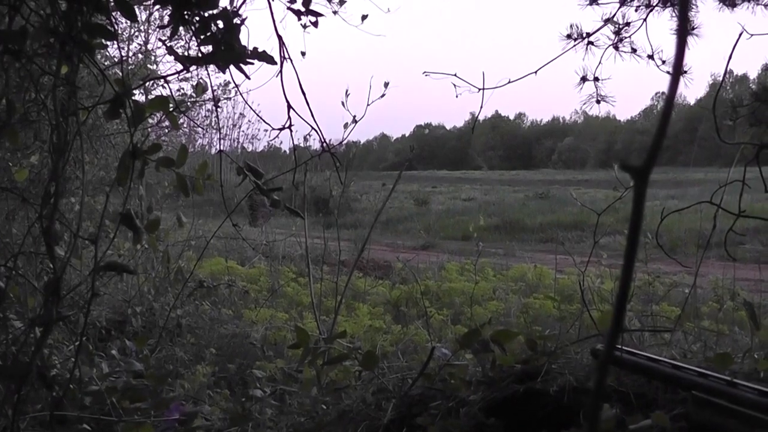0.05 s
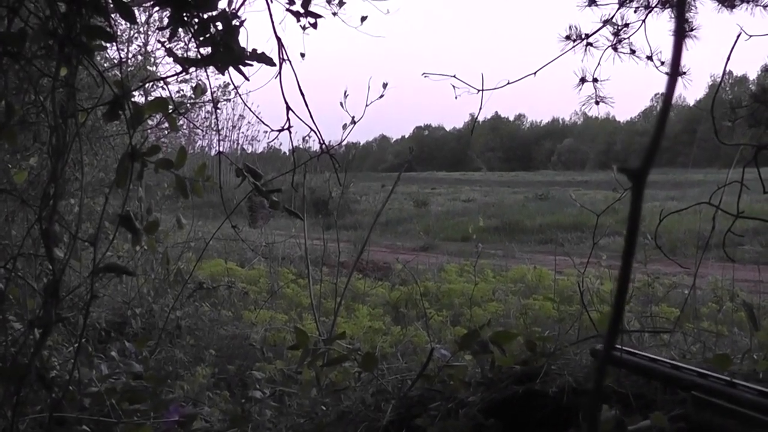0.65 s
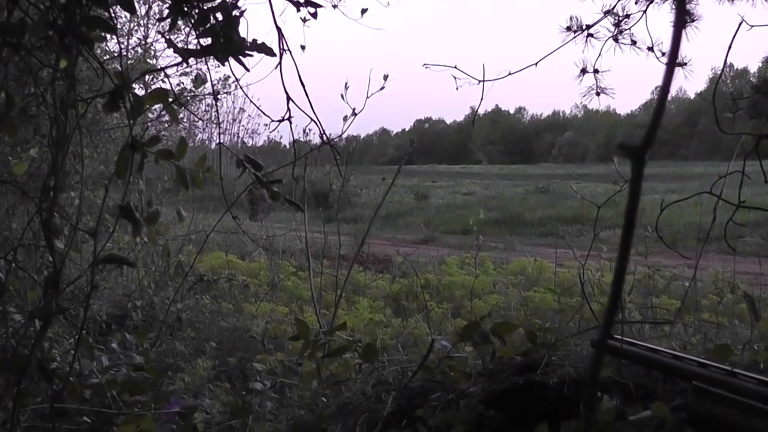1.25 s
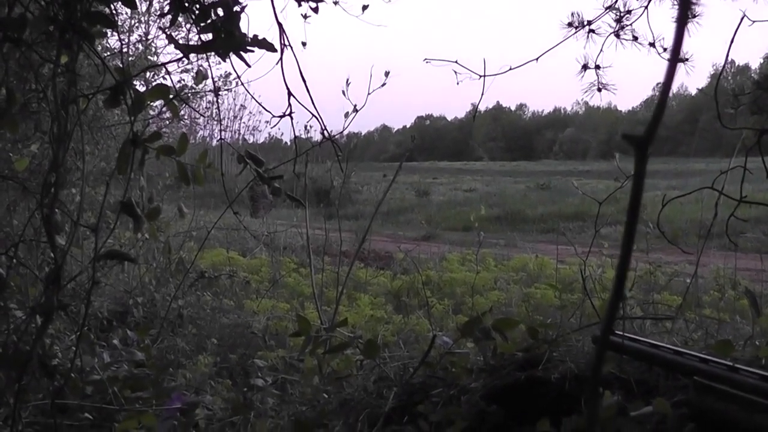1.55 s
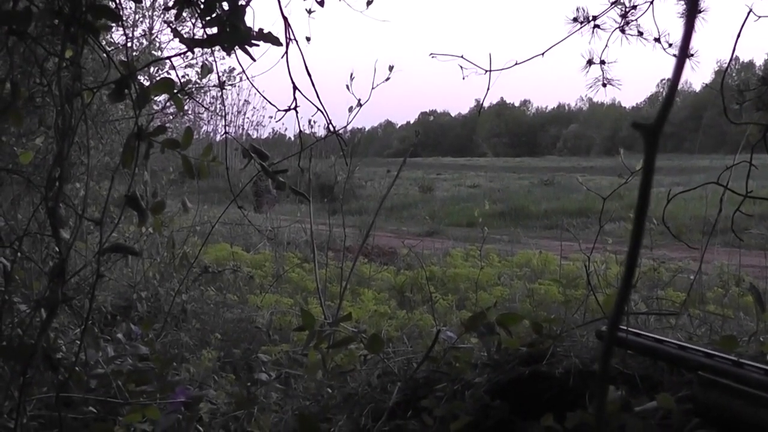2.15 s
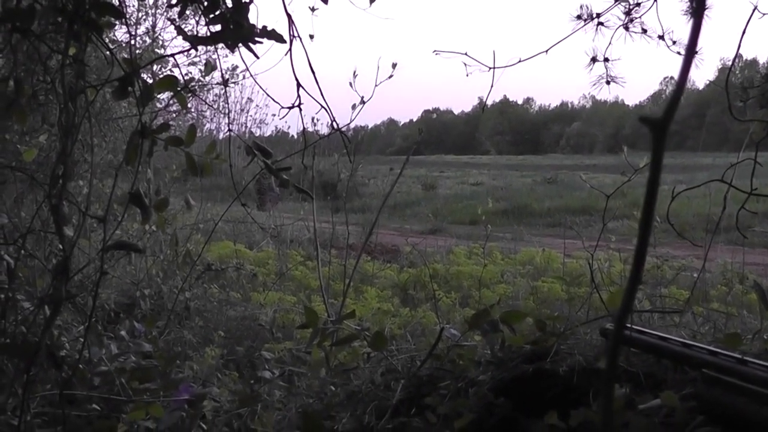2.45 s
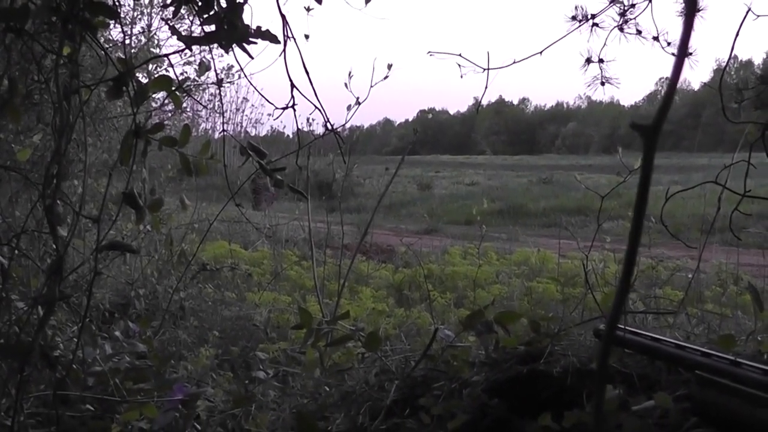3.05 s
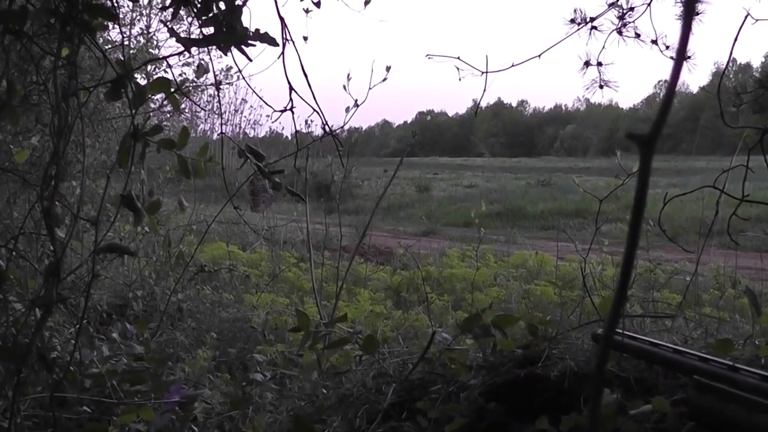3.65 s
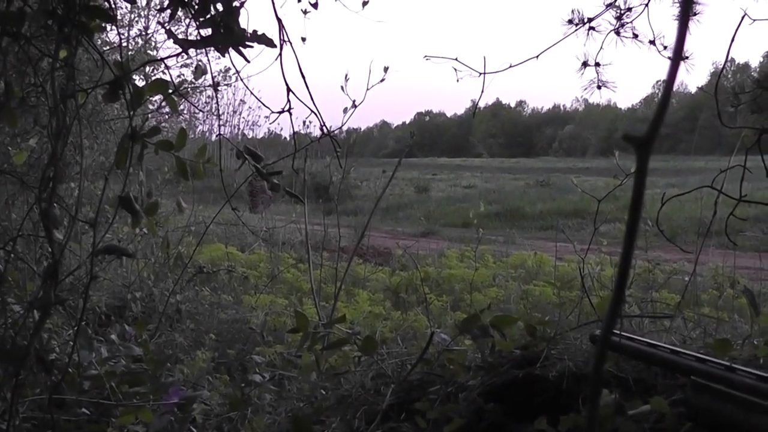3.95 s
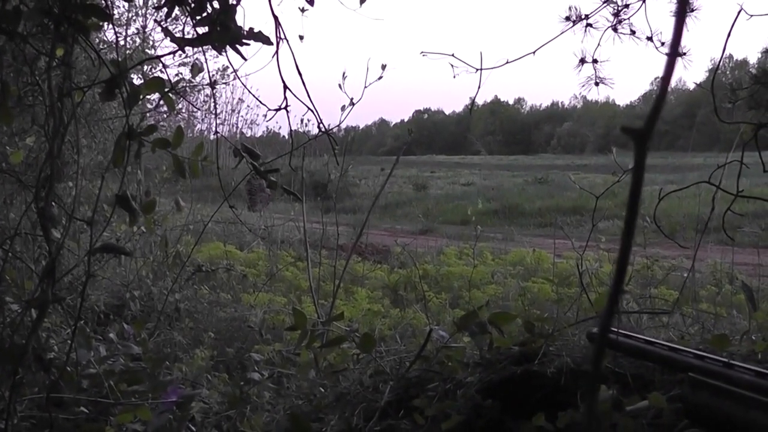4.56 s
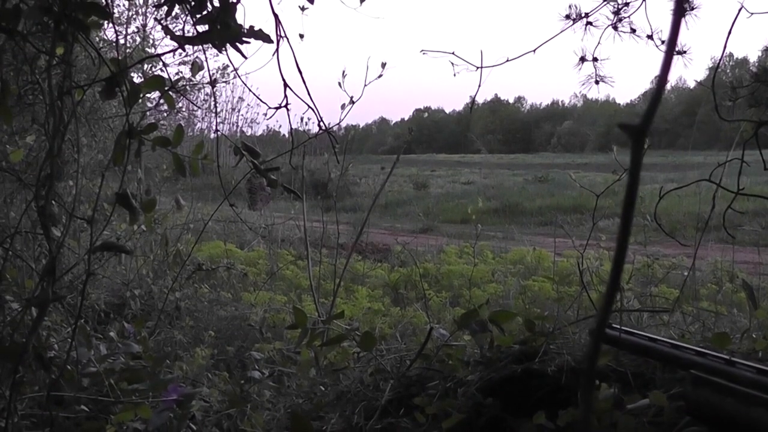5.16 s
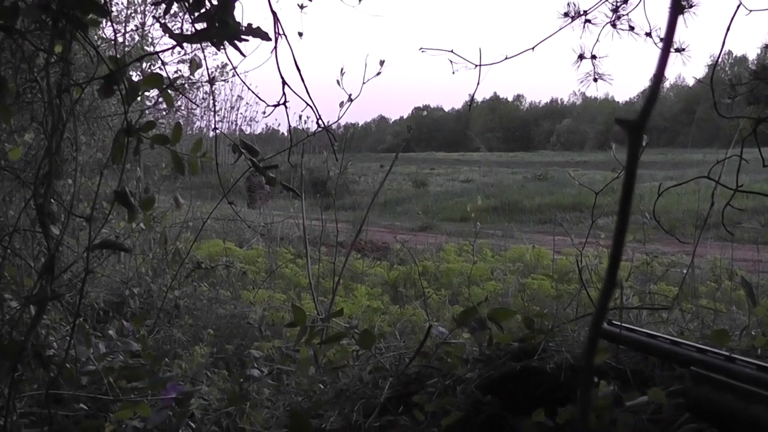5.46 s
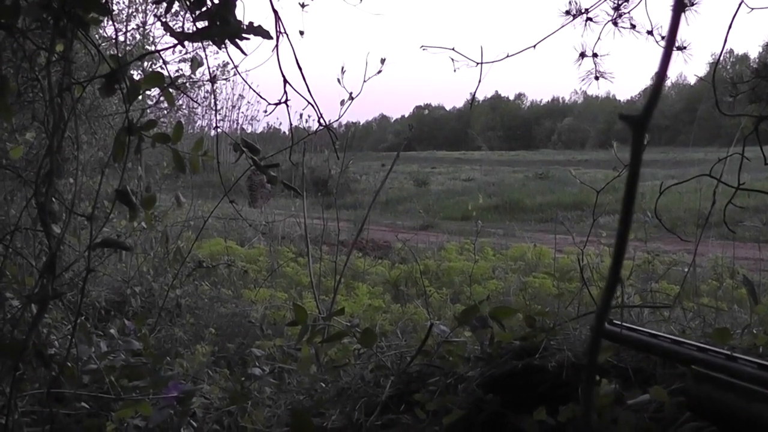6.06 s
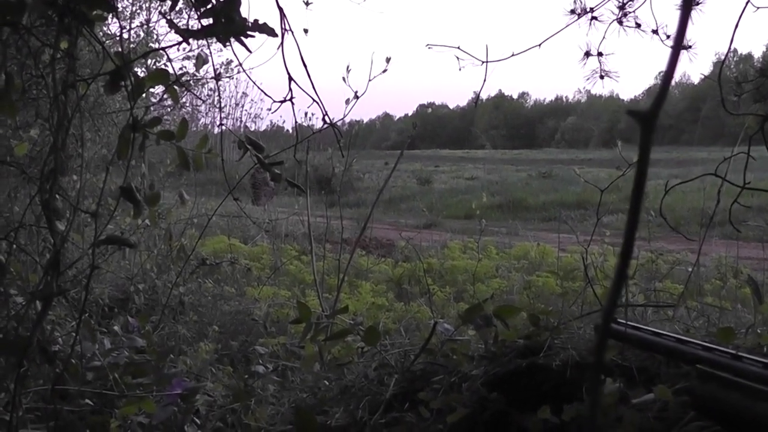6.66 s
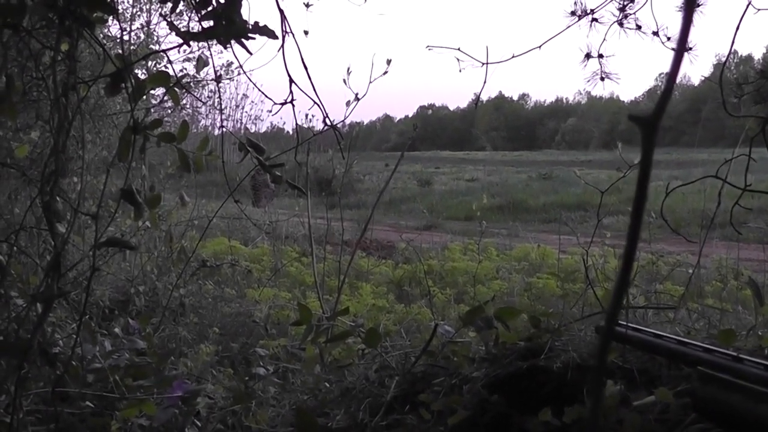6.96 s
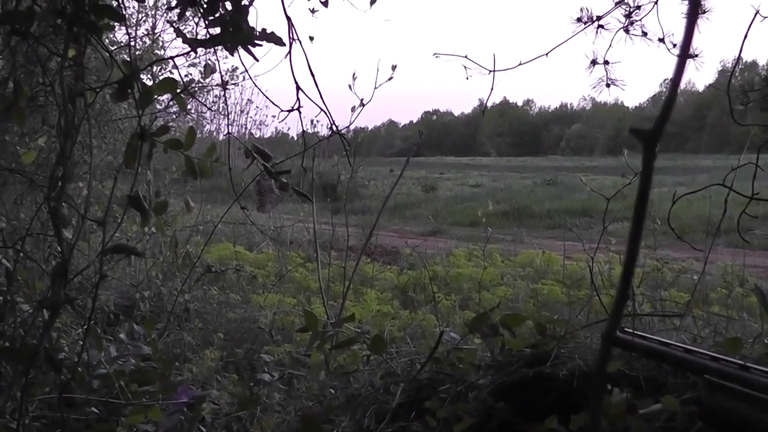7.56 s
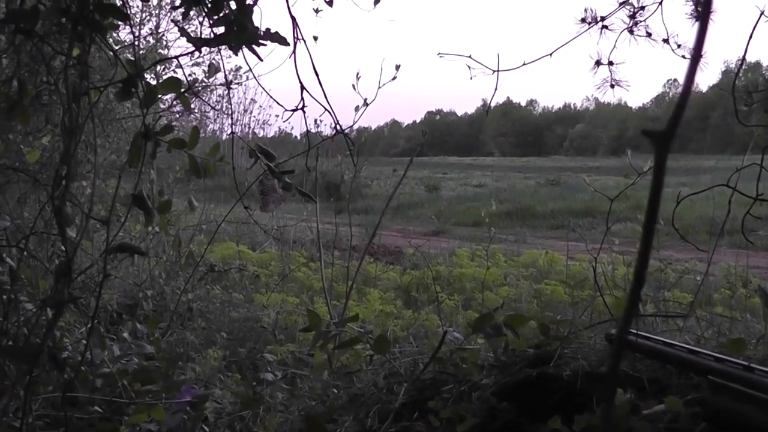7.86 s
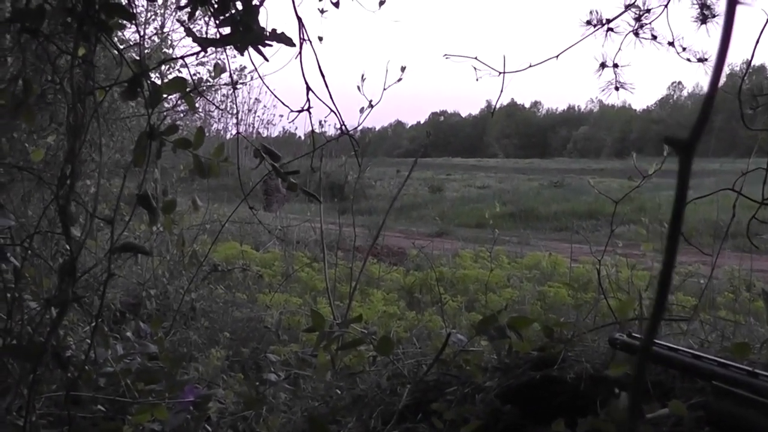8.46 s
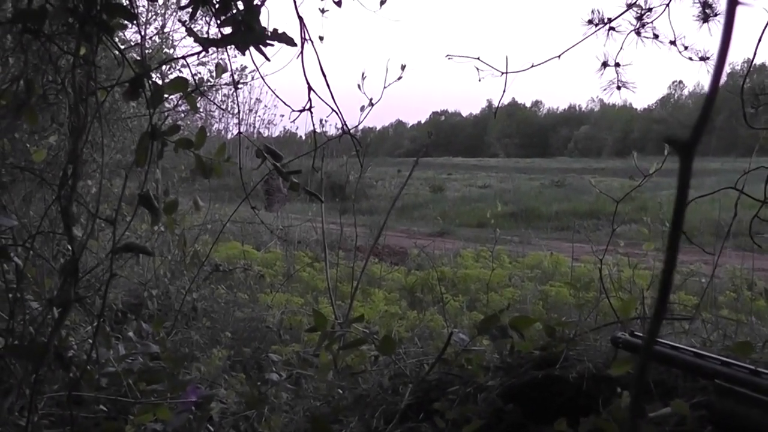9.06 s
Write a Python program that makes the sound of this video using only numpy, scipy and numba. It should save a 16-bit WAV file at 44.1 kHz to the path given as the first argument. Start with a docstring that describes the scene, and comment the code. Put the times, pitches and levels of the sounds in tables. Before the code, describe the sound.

Songbirds sing quietly at a field's edge, then a nearby reed turkey call gives nine evenly spaced, raspy yelps.

```python
"""A reed turkey call plays a run of raspy yelps, close by on the left, at the wooded edge of a field.
Each yelp starts as a whistle and breaks into a rattle as the reed slaps and rings the call's cavity;
in between, the slack reed whines and sputters. Songbirds sing in the trees, twigs and gear tick, and
far traffic drones under a soft hiss. A limiter ducks the background once the yelps begin."""
import sys
import numpy as np
from scipy import signal
from scipy.fft import rfft, irfft, next_fast_len
from scipy.io import wavfile
from scipy.ndimage import uniform_filter1d
from numba import njit

SR = 44100
rng = np.random.default_rng(int(sys.argv[2]) if len(sys.argv) > 2 else 0)


def put_to_file(sound):
    """Save the sound as 16-bit audio at rate SR, in the file named by the first command-line argument."""
    columns = np.atleast_2d(sound).T  # one column per channel
    safe = np.clip(columns, -1, 1)
    whole_steps = np.round(safe * 32767)
    wavfile.write(sys.argv[1], SR, whole_steps.astype(np.int16))


N = 410571
TIME = np.arange(N) / SR

# the yelps: (start [s], length [s], level [dB], rattle [dB], whistle pitch [Hz], whistle decay [s])
YELP_CUES = [(6.354, 0.04, -20.5, -12.5, 1132, 0.048), (6.681, 0.046, -18, -8.5, 1194, 0.012),
             (7.006, 0.058, -14.5, -6.5, 1235, 0.0056), (7.343, 0.047, -12.5, -8.5, 1198, 0.0023),
             (7.676, 0.066, -14.5, -5, 1201, 0.0038), (8.026, 0.087, -14.5, -4, 1293, 0.0071),
             (8.391, 0.1, -14, -5, 1266, 0.0062), (8.775, 0.1, -11.5, -3.5, 1283, 0.0047),
             (9.171, 0.110, -13, -5.5, 1224, 0.0075)]
# resonances of the call's cavity: (frequency [Hz], width [Hz], level [dB])
CAVITY_MODES = [(595, 210, -26.5), (828, 120, -12), (1100, 550, -1), (1620, 205, 9), (1850, 486, -2.5),
                (2250, 430, -1), (2680, 510, -5.5), (3375, 82, -22.5), (3840, 220, 0.5), (4790, 220, -20.5)]
# noisy edge of the slaps: (frequency [Hz], level [dB])
EDGE_EQ = [(100, -5), (300, 2.5), (600, 5), (1500, 5.5), (4000, 4.5), (5500, -9.5), (7500, -6.5),
           (10000, -8.5), (13000, -20), (15500, -29)]
# hollow pop that starts a yelp: (frequency [Hz], level [dB], t60 [s])
POP_MODES = [(96, -11, 0.026), (189, -21, 0.048), (537, -13.5, 0.058), (684, 11.5, 0.014)]
# reed whines: (start [s], end [s], first [Hz], middle [Hz], last [Hz], level [dB], overtones [dB])
WHINE_CUES = [(5.99, 6.118, 903, 971, 710, -55.5, -5.5), (6.39, 6.498, 825, 805, 764, -66.5, -0.5),
              (6.472, 6.524, 1596, 1440, 1354, -56.5, -22), (6.725, 6.833, 1039, 1031, 1080, -58, 3.5),
              (7.07, 7.11, 1110, 1287, 1286, -45.5, -8.5), (7.755, 7.869, 1183, 1150, 820, -54.5, -6),
              (8.466, 8.496, 1786, 1742, 1720, -23, -31.5), (8.511, 8.633, 1160, 1017, 932, -51, -14),
              (8.994, 9.021, 1610, 1380, 1080, -47, -28)]
# reed sputters: (start [s], length [s], level [dB])
SPUTTER_CUES = [(6.018, 0.0086, -42.5), (6.033, 0.01, -41), (6.327, 0.016, -42), (6.339, 0.015, -32.5),
                (6.812, 0.016, -47), (7.167, 0.013, -53), (7.451, 0.015, -55.5)]
# the call's stereo position: (frequency [Hz], left minus right [dB])
CALL_PAN = [(100, 7), (350, 4), (700, 3.5), (1290, 7.5), (2380, 7.5), (4000, 0), (8000, 0), (14000, -0.5)]
# its phase difference between the sides: (frequency [Hz], left minus right phase [rad]); the sides differ most
# in the low pop, about 2 rad near 250 Hz
CALL_PHASE_SPLIT = [(100, 1), (250, 2), (500, 0.9), (1250, 0.77), (1650, 0.5), (3500, 0.5), (8000, 1.45)]

# songbird note shapes: (time [s], pitch [Hz], level [dB])
SLUR_NOTE = [(0, 5300, -12), (.02, 4270, -10.5), (.045, 3710, 3), (.075, 3300, -1.5), (.105, 2950, -5.5),
             (.115, 2080, -6.5), (.13, 1701, -46)]
WARBLE_NOTE = [(0, 2760, -17.5), (.015, 2660, 6), (.035, 2550, 3), (.05, 2340, 2), (.065, 2560, -8.5),
               (.10, 2580, 5.5), (.12, 2580, -21)]
ARCH_NOTE = [(0, 1512, -5), (.03, 1657, 4), (.06, 1754, 5.5), (.095, 1650, 1.5), (.128, 1380, -3)]
SEESAW_NOTE = [(0, 3540, -13), (.03, 3730, 4), (.065, 3880, -10), (.08, 3880, -40), (.125, 3150, -40),
               (.14, 3160, 0), (.18, 3290, -2), (.21, 3260, -6)]
TRILL_NOTE = [(0, 4800, -5.5), (.025, 4730, -1.5), (.05, 4680, -3.5)]
CHIP_NOTE = [(0, 4745, -1), (.006, 7450, 6), (.013, 8000, 2), (.022, 8510, -2)]
# phrases of one repeated note: (start [s], count, spacing [s], level [dB])
SLUR_PHRASES = [(0.045, 2, 0.687, -73), (1.219, 5, 0.402, -53.5), (3.83, 3, 0.42, -76), (6.04, 1, 0.4, -65)]
WARBLE_PHRASES = [(0.548, 5, 0.16, -69.5), (3.088, 5, 0.17, -68.5), (5.005, 5, 0.171, -61),
                  (7.115, 6, 0.16, -66.5)]
ARCH_PHRASES = [(1.345, 5, 0.401, -67)]
SEESAW_PHRASES = [(0.203, 3, 0.375, -71.5)]
TRILL_PHRASES = [(6.55, 26, 0.06, -76.5)]
# lone chips: (time [s], level [dB])
CHIP_CUES = [(0.66, -62.5), (2.47, -62.5), (4.378, -68), (6.535, -64.5)]
# far birds' whistles: (start [s], end [s], first [Hz], middle [Hz], last [Hz], level [dB])
FAR_WHISTLE_CUES = [(0, 0.323, 810, 809, 758, -71), (0, .42, 1675, 1620, 1554, -74),
                    (.19, 0.336, 2020, 2010, 1840, -71.5), (0.102, 0.145, 4460, 4260, 3600, -65.5),
                    (0.763, 0.828, 4560, 4400, 3470, -63.5), (0.872, 1.101, 1993, 1913, 1442, -70.5),
                    (6.227, 6.303, 1756, 1806, 1790, -65), (6.891, 6.968, 1720, 1783, 1765, -67.5)]

# twigs and gear ticking nearby: (time [s], level [dB])
TICK_CUES = [(1.281, -64), (1.981, -59), (3.413, -63), (3.671, -57), (4.164, -59), (4.428, -62.5),
             (4.481, -57.5), (4.568, -53.5), (4.674, -53), (5.073, -63.5), (5.672, -61.5)]
# the ring of a tick: (frequency [Hz], level [dB], t60 [s])
TICK_RING = [(450, 3, 0.046), (630, 1, 0.021), (860, 4.5, 0.016), (1346, 2, 0.023), (1620, 3.5, 0.023),
             (2270, 13.5, 0.0027), (3540, 2, 0.013)]
# soft knocks: (time [s], pitch [Hz], level [dB])
KNOCK_CUES = [(1.271, 265, -50), (1.985, 280, -48.5), (2.588, 315, -50.5), (2.629, 320, -46.5),
              (3.19, 314, -57), (3.542, 317, -51.5)]
# the bed of distant rumble and hiss: (frequency [Hz], level [dB])
AIR_EQ = [(15, -59.5), (25, -36), (43, -19.5), (113, 1), (183, -13.5), (267, -5.5), (368, -10.5), (523, -9),
          (722, -13), (970, -13), (1490, -17), (2560, -16), (2850, -29.5), (3440, -22), (15500, -29)]
# stereo image of the bed: (frequency [Hz], left-right correlation [0-1])
AIR_CORRELATION = [(60, 0.75), (130, 1), (290, 0.87), (640, 0.39), (1400, 0.46), (3100, 1), (6800, 1),
                   (15000, 0.059)]
# level ride on the bed's lower mids: (time [s], gain [dB])
AIR_MID_RIDE = [(0, -0.5), (1, -4.5), (2.6, 4), (4, 1), (5.5, 0), (9.3, -2)]
# drone of far traffic: (time [s], pitch [Hz], level [dB])
TRAFFIC_DRONE = [(0, 122, -79), (0.7, 131, -72), (2.1, 125, -78.5), (2.7, 110, -79.5), (3.8, 100, -79.5),
                 (6.2, 104, -71), (6.9, 100, -77), (9.3, 100, -91)]

SLAPS_PER_S, OPEN_TUNING = 610, 0.96   # rattle rate; scale on the open cavity's frequencies
FADE_FROM, FADE_DB = 0.35, 18.5   # the pressure holds for this share of a yelp, then sinks this far
FULL_YELP_S, TILT_PER_DOUBLING = 0.14, 3.5   # longer yelps are driven harder: more tilt [dB/octave]


def yelps(pre_s=0.006, lead_in_share=0.26, lead_in_db=-28.5):
    """The run of yelps on the reed, each swelling out of its soft lead-in."""
    out = np.zeros(N)
    for start, length, db, rattle_db, whistle_hz, whistle_s in YELP_CUES:
        stir_s = lead_in_share * length
        add(out, start - stir_s, from_db(db + lead_in_db) * lead_in(stir_s))
        add(out, start - pre_s, from_db(db) * yelp(length, rattle_db, whistle_hz, whistle_s, pre_s))
    return out


def yelp(length, rattle_db, whistle_hz, whistle_s, pre_s, pre_swell=0.38, attack_s=0.00093,
         stop_s=0.002, closed=0.14, open_s=0.022, reed_hz=1830, bend=0.37, bend_s=0.038):
    """A rising whistle, then a rattle that bends upward as the cavity opens, until the pressure fades."""
    t = TIME[:int((pre_s + length + 10 * stop_s) * SR)]
    age = np.maximum(t - pre_s, 0)
    fading = np.clip((age / length - FADE_FROM) / (1 - FADE_FROM), 0, 1) ** 2.29
    pressure = from_db(-FADE_DB * fading) * np.exp(-np.maximum(age - length, 0) / stop_s)
    snap = (1 + np.tanh((t - pre_s) / attack_s)) / 2
    swell = pre_swell * np.minimum(t / pre_s, 1) + (1 - pre_swell) * snap
    # the tuning sags and the tone dulls as the pressure fades
    sag, wander = 0.03 * fading, 0.014 * drift(len(t), 90)
    tuning = OPEN_TUNING * (1 - closed * np.exp(-age / open_s) - sag + wander)
    tilt = TILT_PER_DOUBLING * np.log2(length / FULL_YELP_S)
    swing = from_db(-5) * reed_tone(reed_hz * tuning, second_db=-12, upper_db=-36, waver=.03)
    swing *= 1 + .7 * drift(len(t), 700)   # the slaps shake the reed's own swing
    rattle = rasp(t, SLAPS_PER_S, tuning, tilt - 4 * fading) + swing
    shudder_db = 1.13 * drift(len(t), 380)
    rattle *= from_db(rattle_db + shudder_db) * (1 - np.exp(-age / 0.0016))
    rising_hz = whistle_hz * (1 + bend * np.minimum(age / bend_s, 1) ** 3)
    whistle = reed_tone(rising_hz, second_db=-31.5, upper_db=-31, waver=.02)
    whistle *= np.sqrt(2) / (1 + (age / whistle_s) ** 3)
    out = pressure * swell * (rattle + whistle)
    add(out, pre_s / 2, kick(t, tilt)[:len(t) - int(pre_s / 2 * SR)])
    return out


def rasp(t, slap_hz, tuning, tilt, jitter=0.059, uneven_db=4.0, weak_db=-3.5, edge_db=-20.5):
    """The reed slaps unevenly, strong and weak in turn, and rings the cavity; tilt brightens it."""
    count = int(t[-1] * slap_hz * 2) + 2
    chance = np.clip(rng.standard_normal((count, 2)), -2, 1.3)   # capped: no slap sticks out as a click
    slap_times = (np.cumsum(np.clip(1 + jitter * chance[:, 0], .5, 2)) - .5) / slap_hz
    force = from_db(uneven_db * chance[:, 1] + weak_db * (np.arange(count) % 2))
    slaps = np.bincount((slap_times * SR).astype(int), force, len(t))[:len(t)]
    flare = signal.lfilter([1], [1, -np.exp(-1 / (0.00075 * SR))], slaps)
    turbulence = flare * rng.standard_normal(len(t))
    drive = slaps + 0.04 * turbulence   # only a little air, so the rasp stays pitched
    body = 0
    for k, (hz, width, db) in enumerate(CAVITY_MODES):
        rung = resonate(resonate(drive, hz * tuning, float(width)), hz * tuning, float(width))
        body += (-1) ** k * from_db(db + tilt * np.log2(hz / 1500)) * rung
    edge = shaped(turbulence, lambda f: from_db(at_hz(EDGE_EQ, f)))
    edge *= 1 + 3.2 * np.exp(-t / 0.024)   # the first slaps are the sharpest
    return rms_one(body) + from_db(edge_db + tilt) * rms_one(edge)


def reed_tone(hz, second_db, upper_db, waver, formant_hz=3400, width_hz=480):
    """The reed swings cleanly; upper harmonics light up as they cross the cavity's high resonance."""
    phase = 2 * np.pi * np.cumsum(hz * (1 + waver * drift(len(hz), 480))) / SR
    upper = sum(np.sin(k * phase) / (1 + (2 * (k * hz - formant_hz) / width_hz) ** 2) for k in (3, 4))
    tone = np.sin(phase) + from_db(second_db) * np.sin(2 * phase) + from_db(upper_db) * upper
    return np.sqrt(2) * tone


def kick(t, tilt, pop_db=-6, spit_db=-16, spit_per_tilt=1.9, spit_s=0.0035):
    """The reed kicks into motion with a hollow pop and a bright spit."""
    pop = sum(from_db(db) * ring(t, hz, t60) for hz, db, t60 in POP_MODES)
    pop *= 1 - np.exp(-t / 0.0025)
    spit = lowpass(rng.standard_normal(len(t)), 8500)
    flare = (t / spit_s) ** 2 * np.exp(2 * (1 - t / spit_s))
    return from_db(pop_db) * pop + from_db(spit_db + spit_per_tilt * tilt) * flare * spit


def lead_in(length, pitch_hz=880, scratch_db=-4):
    """As the pressure builds, the reed stirs on a low scratchy tone."""
    hz, swell = glide(length, [pitch_hz] * 3, fade_s=0.021)
    scratch = from_db(scratch_db) * rasp(TIME[:len(hz)], SLAPS_PER_S, np.full(len(hz), 0.85), tilt=-7.5)
    return swell * (reed_tone(hz, second_db=-9, upper_db=-15, waver=0.033) + scratch)


def whines(scratch_db=-14, formant_hz=1600, width_hz=520):
    """Under light pressure the reed glides; its octave lights up at the cavity's main resonance."""
    out = np.zeros(N)
    for start, end, *pitches, db, overtones_db in WHINE_CUES:
        hz, swell = glide(end - start, pitches, fade_s=0.012)
        second_db = overtones_db - 20 * np.log10(1 + (2 * (2 * hz - formant_hz) / width_hz) ** 2)
        scratch = from_db(scratch_db) * rasp(TIME[:len(hz)], SLAPS_PER_S, np.ones(len(hz)), tilt=-1.6)
        tone = reed_tone(hz, second_db, overtones_db, waver=0.018)
        add(out, start, from_db(db) * swell * (tone + scratch))
    return out


def sputters(cluck_hz=1130, cluck_db=1):
    """A few dull slaps around a short cluck when the reed only just catches."""
    out = np.zeros(N)
    for start, length, db in SPUTTER_CUES:
        t = TIME[:int(length * SR)]
        cluck = reed_tone(np.full(len(t), cluck_hz), second_db=-30, upper_db=-25.5, waver=0.094)
        slaps = rasp(t, slap_hz=480, tuning=np.full(len(t), 0.92), tilt=-9)
        add(out, start, from_db(db) * np.hanning(len(t)) ** 0.54 * (slaps + from_db(cluck_db) * cluck))
    return out


def from_the_left(x):
    """The caller sits to the left, so that side hears the mids louder and earlier."""
    half = np.array([[.5], [-.5]])
    return shaped(x, lambda f: from_db(half * at_hz(CALL_PAN, f))
                  * np.exp(1j * half * at_hz(CALL_PHASE_SPLIT, f)))


def songbirds():
    """Slurs, chips and far whistles get more reverb; warbles, arches, seesaw and trill sound drier."""
    wetter = bird(SLUR_NOTE, phrases(SLUR_PHRASES), waver=0.0166)
    wetter += bird(CHIP_NOTE, CHIP_CUES, waver=.04) + far_whistles()
    drier = bird(WARBLE_NOTE, phrases(WARBLE_PHRASES))
    drier += bird(ARCH_NOTE, phrases(ARCH_PHRASES))   # the low ending of each loud slur
    drier += bird(SEESAW_NOTE, phrases(SEESAW_PHRASES)) + bird(TRILL_NOTE, phrases(TRILL_PHRASES))
    scatter = woods(wetter, t60=0.2, wet_db=-7.5, cutoff_hz=9880, correlation=0.45, build_s=0.0014)
    tail = woods(wetter + 0.55 * drier, t60=0.76, wet_db=-3, cutoff_hz=5750, correlation=1)
    return from_db(-4.5) * wetter + from_db(-5) * drier + scatter + tail


def bird(shape, notes, waver=0.0096):
    """A bird repeats one whistled note, its pitch wavering a little differently each time."""
    out = np.zeros(N)
    times, hz, db = np.transpose(shape)
    t = np.arange(int(times[-1] * SR)) / SR
    for start, level_db in notes:
        pitch = np.interp(t, times, hz) * (1 + waver * drift(len(t), 150))
        gain = from_db(level_db + np.interp(t, times, db)) * signal.windows.tukey(len(t), .1)
        add(out, start, gain * sine(pitch))
    return out


def phrases(rows):
    """Spell phrases out as evenly spaced notes: (time [s], level [dB])."""
    return [(start + k * spacing, db) for start, count, spacing, db in rows for k in range(round(count))]


def far_whistles():
    """Birds across the field whistle pure slurred notes."""
    out = np.zeros(N)
    for start, end, *pitches, db in FAR_WHISTLE_CUES:
        hz, swell = glide(end - start, pitches, fade_s=0.016)
        add(out, start, from_db(db) * swell * sine(hz))
    return out


def twigs_and_gear(tick_trim_db=-3):
    """Twigs and gear give dry ticks, each a crack with a short ring, and soft low knocks."""
    out, t = np.zeros(N), TIME[:SR // 5]
    for start, db in TICK_CUES:
        modes = 0
        for hz, mode_db, t60 in TICK_RING:
            gain = from_db(mode_db + 2 * rng.standard_normal())
            detune = 1 + 0.033 * rng.standard_normal()
            modes += gain * ring(t, hz * detune, t60) * rng.choice([-1, 1])
        crack = lowpass(rng.standard_normal(len(t)), 4500) * np.exp(-t / 0.0061)
        add(out, start, from_db(db + tick_trim_db) * (modes + 1.1 * crack))
    for start, hz, db in KNOCK_CUES:
        add(out, start, from_db(db) * ring(t, hz, t60=0.081) * (1 - np.exp(-t / 0.00075)))
    return out


def woods(x, t60, wet_db, cutoff_hz, correlation, build_s=0.0022):
    """Trunks and leaves scatter a dull reverb tail back to both sides."""
    t = TIME[:int(1.5 * SR)]
    mid, side = rng.standard_normal((2, len(t)))
    noise = np.sqrt(1 + correlation) * mid + np.sqrt(1 - correlation) * side * [[1], [-1]]
    tail = noise * from_db(-60 * t / t60) * (1 - np.exp(-t / build_s))
    tail = lowpass(rms_one(tail) / np.sqrt(len(t)), cutoff_hz)
    return from_db(wet_db) * signal.fftconvolve(x[None], tail, axes=1)[:, :N]


def field_air(level_db=-66):
    """The open field's bed of soft rumble and hiss; its lower mids slowly swell and sink."""
    mid, side = rng.standard_normal((2, N))
    correlation = lambda f: np.clip(at_hz(AIR_CORRELATION, f), 0, 1)
    mid = shaped(mid, lambda f: from_db(at_hz(AIR_EQ, f)) * np.sqrt(1 + correlation(f)))
    side = shaped(side, lambda f: from_db(at_hz(AIR_EQ, f)) * np.sqrt(1 - correlation(f)))
    hiss = from_db(level_db + .5 * drift(N, 6.4)) * rms_one(mid + side * [[1], [-1]])
    low_mids = shaped(hiss, lambda f: np.exp(-np.log2((f + 1) / 680) ** 2))
    ride = from_db(np.interp(TIME, *np.transpose(AIR_MID_RIDE)))
    return hiss + (ride - 1) * low_mids


def far_traffic(width_hz=26.0, waver_db=2):
    """Far traffic drones as a narrow, wavering band of low noise."""
    times, hz, db = np.transpose(TRAFFIC_DRONE)
    pitch = np.interp(TIME, times, hz)
    drone = resonate(resonate(rng.standard_normal(N), pitch, width_hz), pitch, width_hz)
    return from_db(np.interp(TIME, times, db) + waver_db * drift(N, 3.4)) * rms_one(drone)


def glide(length, pitches, fade_s):
    """Pitch curve through a first, middle and last pitch, and a fluttering swell to go with it."""
    progress = np.linspace(0, 1, int(length * SR))
    hz = np.polyval(np.polyfit([0, .5, 1], pitches, 2), progress)
    fades = np.clip(np.minimum(progress, 1 - progress) * length / fade_s, 0, 1)
    return hz, fades * from_db(1.2 * drift(len(hz), 70))


def sine(hz):
    """A pure tone of rms 1 that follows a pitch curve."""
    return np.sqrt(2) * np.sin(2 * np.pi * np.cumsum(hz) / SR)


def ring(t, hz, t60):
    """A struck mode, dying by 60 dB in t60 seconds."""
    return np.sin(2 * np.pi * hz * t) * 1000 ** (-t / t60)


def drift(size, rate):
    """Random wander of spread about 1, with `rate` turning points a second."""
    points = rng.standard_normal(int(size * rate / SR) + 2)
    return np.interp(np.arange(size) * rate / SR, np.arange(len(points)), points)


@njit
def resonate(x, hz, width):
    """A swept resonance with a peak gain of 1."""
    r, y = np.exp(-np.pi * width / SR), np.zeros(len(x))
    for i in range(2, len(x)):
        feedback = 2 * r * np.cos(2 * np.pi * hz[i] / SR) * y[i - 1] - r * r * y[i - 2]
        y[i] = (1 - r * r) / 2 * (x[i] - x[i - 2]) + feedback
    return y


def lowpass(x, hz):
    """Roll off the top at 12 dB per octave."""
    return signal.sosfilt(signal.butter(2, hz, fs=SR, output="sos"), x)


def shaped(x, gain):
    """EQ by a gain that is a function of frequency."""
    size = next_fast_len(x.shape[-1] + 2048)
    hz = np.arange(size // 2 + 1) * SR / size
    return irfft(rfft(x, size) * gain(hz), size)[..., :x.shape[-1]]


def at_hz(points, hz):
    """Read a table on a log-frequency axis."""
    f, value = np.transpose(points)
    return np.interp(np.log(hz + 1e-3), np.log(f), value)


def from_db(db):
    """Decibels to gain."""
    return 10 ** (np.asarray(db) / 20)


def rms_one(x):
    """Scale to an rms of 1."""
    return x / np.sqrt(np.mean(x ** 2) + 1e-20)


def add(track, start_s, sound):
    """Mix a sound in at a given time."""
    i = int(start_s * SR)
    track[i:i + len(sound)] += sound[:N - i]


def scene():
    """The mix: the call up front, birds in the trees, the field behind."""
    call = yelps() + whines() + sputters()
    birds = songbirds() * from_db([[.7], [-.7]])   # a touch to the left
    echo = woods(call, t60=0.59, wet_db=-32, cutoff_hz=4000, correlation=0.95)
    return from_the_left(call) + echo + birds + twigs_and_gear() + field_air() + far_traffic()


def limiter(x, threshold_db=-19, release_db_per_s=8, attack_s=0.0026):
    """Loud sound pulls the gain down within milliseconds; it creeps back slowly."""
    power = uniform_filter1d((x ** 2).max(axis=0), size=260)
    over_db = np.maximum(10 * np.log10(np.abs(power) + 1e-12) - threshold_db, 0)
    held_db = np.maximum.accumulate(over_db + release_db_per_s * TIME) - release_db_per_s * TIME
    pole = np.exp(-1 / (attack_s * SR))
    return x * from_db(-signal.lfilter([1 - pole], [1, -pole], held_db))


def record(dry):
    """Master chain: the limiter, then a steep high cut."""
    return signal.sosfilt(signal.ellip(10, .1, 80, 15800, fs=SR, output="sos"), limiter(dry))


dry = scene()
out = record(dry)
put_to_file(out)
```